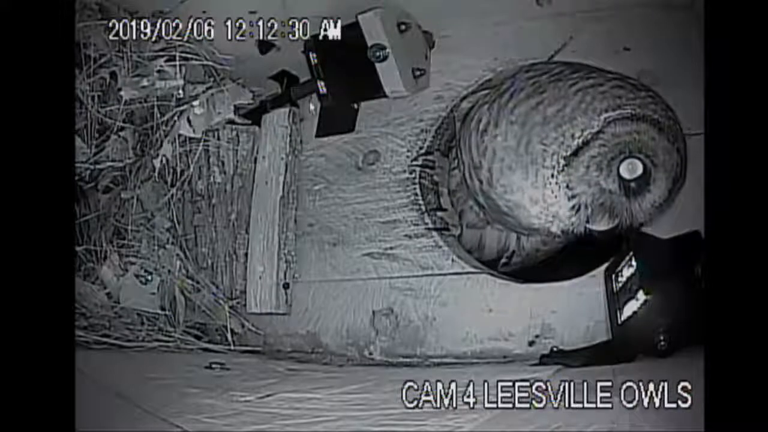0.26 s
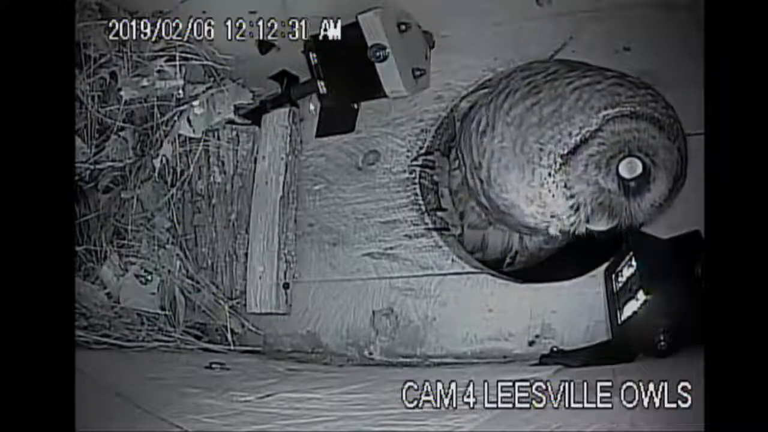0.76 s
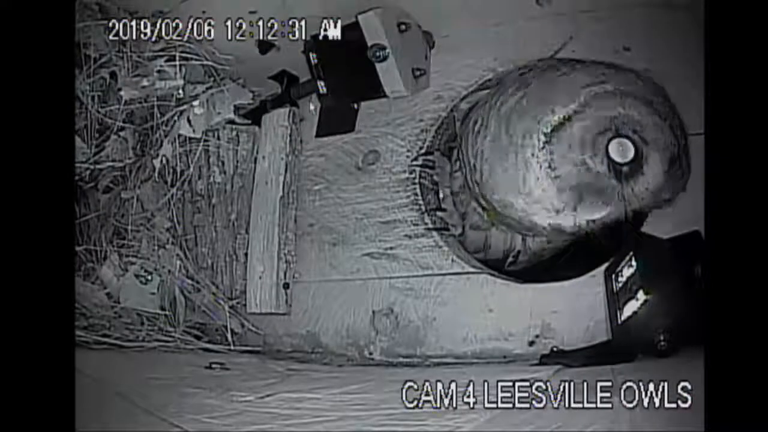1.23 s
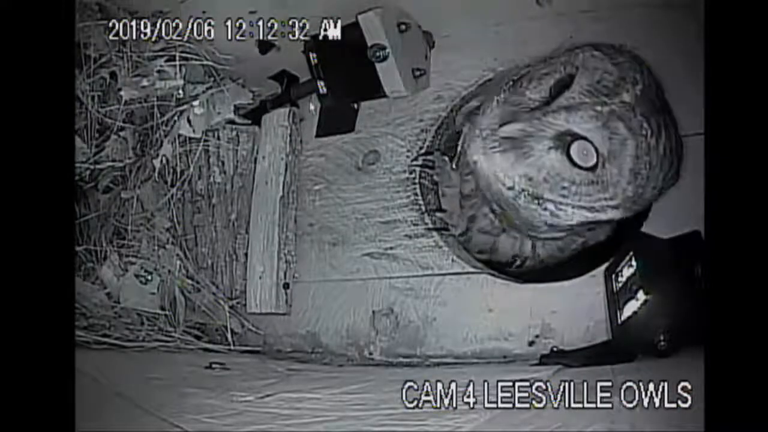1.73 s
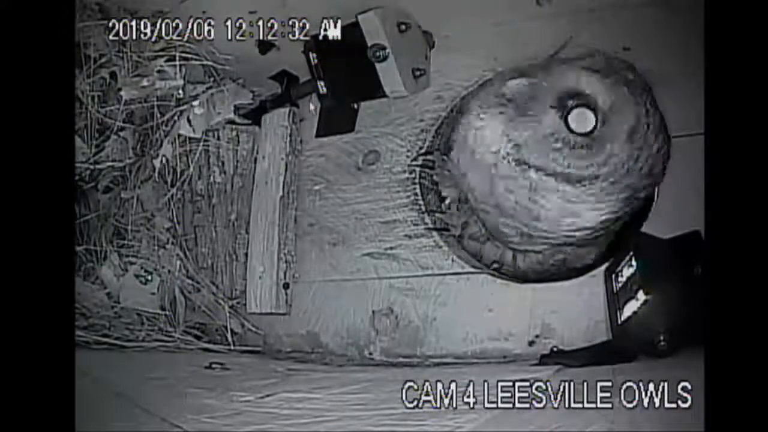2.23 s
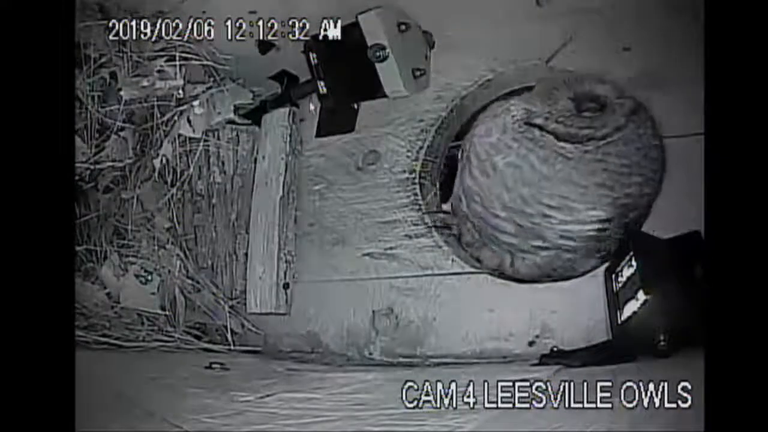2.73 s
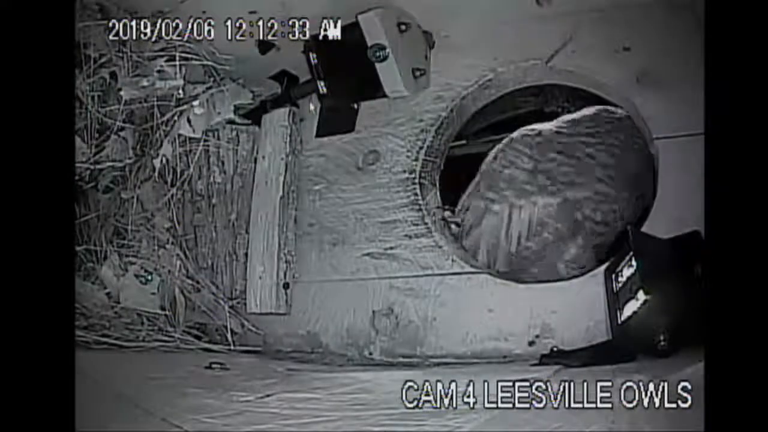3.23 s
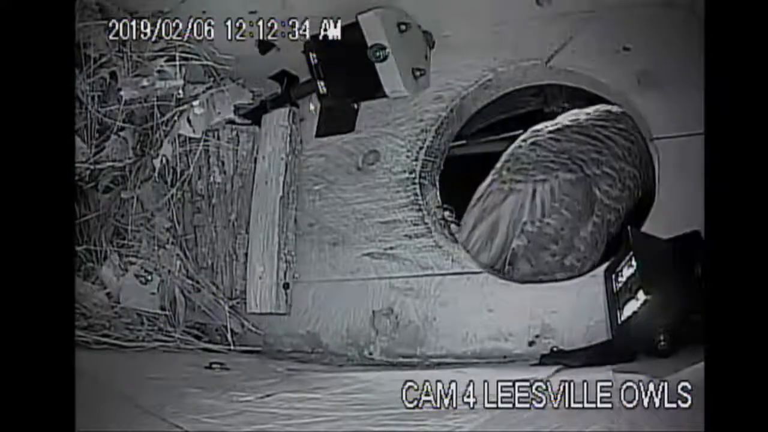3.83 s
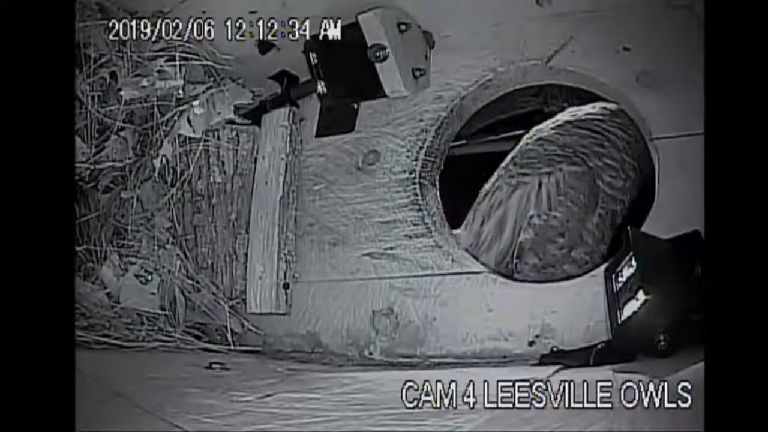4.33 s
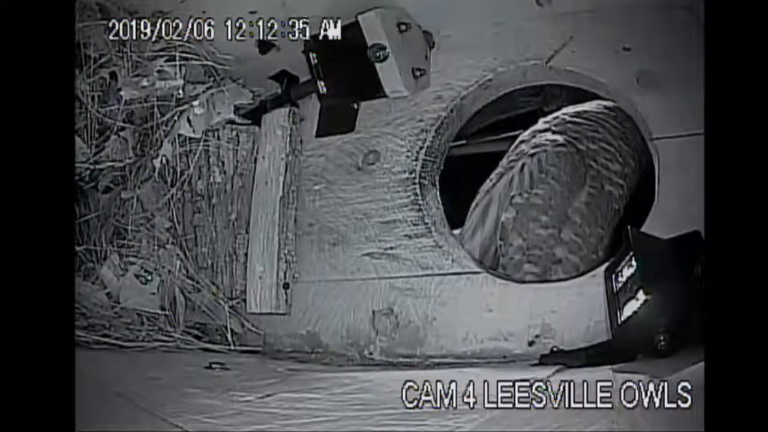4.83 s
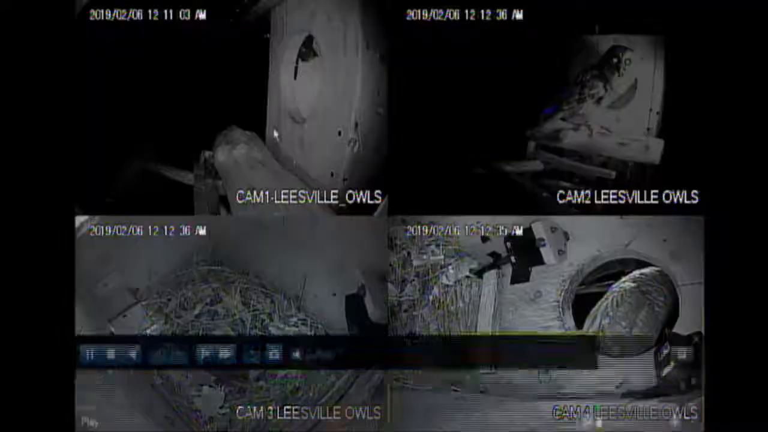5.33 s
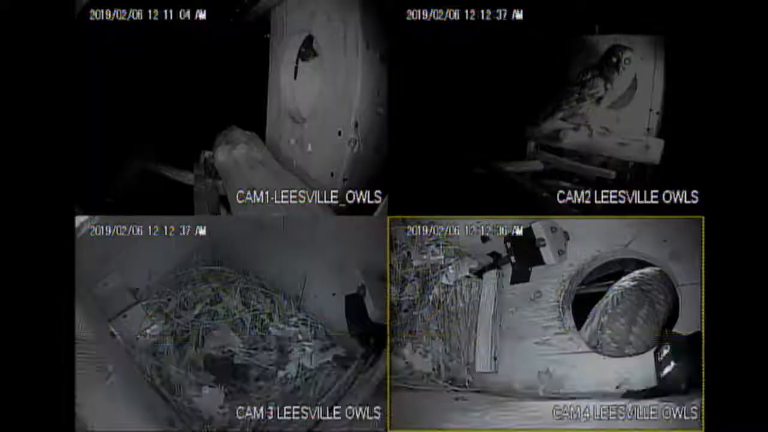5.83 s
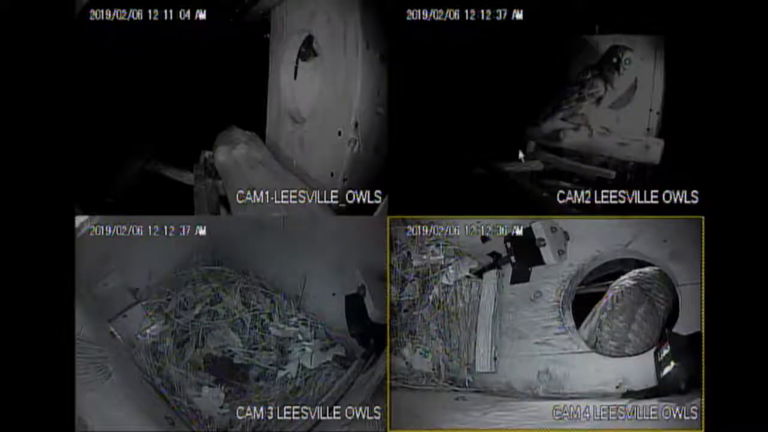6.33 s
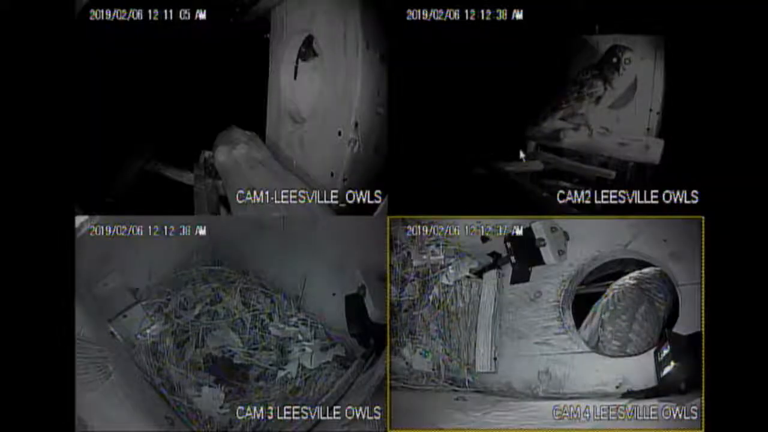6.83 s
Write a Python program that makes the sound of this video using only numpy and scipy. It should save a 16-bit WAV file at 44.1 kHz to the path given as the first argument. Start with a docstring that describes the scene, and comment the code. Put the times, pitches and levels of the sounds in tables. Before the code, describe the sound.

An owl hoots close by in two quick runs, each ending on a falling note, with claws and feathers scraping wood in between.

```python
"""Over faint night hiss, a barred owl in the entrance of a wooden nest box gives six short hoots and a
long falling note. Each hoot arches in pitch, so its overtones sweep through the ring of the box, and
the loud ones overload the small camera microphone inside. Next the owl turns to face outward: claws
scrape the rim and feathers brush the wood. As it settles it gives eight more short hoots, softer at
first, and ends on another long falling note."""
import sys
import numpy as np
from scipy import signal
from scipy.fft import rfft, irfft, next_fast_len
from scipy.io import wavfile
from scipy.ndimage import uniform_filter1d, map_coordinates

SR = 44100
rng = np.random.default_rng(int(sys.argv[2]) if len(sys.argv) > 2 else 0)


def persist_wave(psi):
    """Save psi, clipped to +-1, as 16-bit WAV."""
    counts = np.round(np.clip(psi, -1, 1) * 32767).astype(np.int16)
    wavfile.write(sys.argv[1], SR, np.atleast_2d(counts).T)


N = 311346

TURN_S = 3.0  # from here on the owl faces outward
REST_HZ = 123.85  # a short hoot starts and ends at this pitch
# The owl twists its head, swings its body round, then settles:
# (start [s], length [s], relative feather level [dB], relative rumble level [dB])
MOVES = [(2.296, 0.49, -62, -74), (2.793, .27, -51.5, -59), (3.699, 0.38, -75, -57.5)]


def amp(db):
    """Turn decibels into a number to multiply by."""
    return 10 ** (np.asarray(db) / 20)


def unit(x):
    """Scale a signal to an average (rms) size of 1."""
    return x / np.sqrt(np.mean(x ** 2) + 1e-20)


def clock():
    """The time of each sample, in seconds."""
    return np.arange(N) / SR


def wobble(rate):
    """A smooth curve through `rate` random points a second."""
    knots = rng.standard_normal(int(N * rate / SR) + 4)
    steps = np.arange(4 * len(knots)) / 4
    return np.interp(clock() * rate, steps, map_coordinates(knots, [steps]))


def coloured(x, points, size=4096):
    """Shape the tone of x along points of (frequency [Hz], gain [dB])."""
    points_hz, db = np.transpose(points)
    hz = np.fft.rfftfreq(size, 1 / SR)
    gain = amp(np.interp(np.log(hz + 1), np.log(points_hz + 1), db))
    # fold the filter so that it never answers before the sound arrives
    cepstrum = irfft(np.log(gain))
    cepstrum[1:size // 2] *= 2
    cepstrum[size // 2 + 1:] = 0
    return signal.oaconvolve(x, irfft(np.exp(rfft(cepstrum))))[:len(x)]


def cut_above(x, top_hz):
    """Remove every frequency from top_hz up."""
    size = 2 * next_fast_len(N // 2 + SR // 2)
    passes = np.fft.rfftfreq(size, 1 / SR) < top_hz
    return irfft(rfft(x, size) * passes, size)[..., :N]


def noise(spectrum):
    """Noise of average size 1, shaped by (frequency [Hz], relative level [dB]) points."""
    return unit(coloured(rng.standard_normal(N), spectrum))


def resonances(x, modes):
    """The ringing that x sets off, one tone per (frequency [Hz], width [Hz], gain [dB])."""
    return sum(amp(db) * signal.lfilter(*signal.iirpeak(hz, hz / width, fs=SR), x)
               for hz, width, db in modes)


def saturate(x, upper, lower, hardness):
    """Round off the peaks of a wave, with separate limits above and below zero."""
    limit = np.where(x > 0, upper, lower)
    return x / (1 + np.abs(x / limit) ** hardness) ** (1 / hardness)


def moving(start, length, attack_s=0.039, fade_s=0.53):
    """One body movement swells quickly, holds, then drops 60 dB every fade_s."""
    t = clock()
    swell = np.clip((t - start) / attack_s + 1, 0, 1)
    return swell * amp(-60 * np.maximum(t - start - length, 0) / fade_s)


def background(hiss_db, rumble_gain_db):
    """Faint night hiss, and a low rumble in the box that swells when the owl shifts its weight."""
    # tone of the night air: (frequency [Hz], relative level [dB])
    night = [(25, -12.5), (75, 6), (150, -10), (300, -6.5), (470, -1.5), (650, -8), (1500, -14.5),
             (3200, -12), (4500, -14), (8000, -28), (15000, -40)]
    sitting_still = amp(-68.5)
    shuffle = sum(amp(db) * moving(start, length) for start, length, _, db in MOVES)
    rumble = noise([(30, -25), (55, -10.5), (74, 1.0), (110, -9.0), (220, -25.5), (800, -63.5)])
    return amp(hiss_db) * noise(night) + amp(rumble_gain_db) * (sitting_still + shuffle) * rumble


def feathers(gain_db, flutter_db):
    """Feathers brush the entrance as the owl moves, making a fluttering rustle."""
    brush = sum(amp(db) * moving(start, length) for start, length, db, _ in MOVES)
    flutter = amp(gain_db + flutter_db * wobble(45))
    rustle = noise([(150, -22.5), (500, 2.5), (1300, 1.5), (2800, -20), (4000, -21.5), (8000, -33.5)])
    return brush * flutter * rustle


def taps(per_s=13, db=-57, scatter_db=5, bright_db=6.5, drag_s=0.01, middle_hz=1400):
    """Light claw touches scattered through each movement, as rows like the grips in claws()."""
    rows = []
    for start, length, _, _ in MOVES:
        slots = np.arange(start, start + length, 1 / per_s)
        for slot, (late, size, spot) in zip(slots, rng.uniform(-1, 1, (20, 3))):
            time = slot + abs(late) / per_s
            rows.append((time, db + scatter_db * size, bright_db, drag_s, middle_hz * 2 ** (spot / 2)))
    return rows


def claws(knock_db, scratch_db, thud_db, attack_s=0.001, fade_s=0.053):
    """Each claw drags in tiny slips over its own spot of the rim, ringing and jolting the box."""
    # firm grips on the rim:
    # (time [s], relative level [dB], brightness [dB], drag time [s], ring of the spot [Hz])
    grips = [(2.248, -40, -6.5, 0.0047, 2286), (2.44, -39, -10, 0.012, 933), (2.568, -42, 9, .015, 2130),
             (2.603, -38, -24, .003, 445), (2.761, -38, 11.5, 0.0037, 1390),
             (2.825, -30.5, 6.5, 0.016, 1364), (2.877, -28.5, 7, 0.0042, 1060),
             (2.918, -33, 4, 0.0026, 2900), (2.924, -21.5, -20, 0.0074, 690),
             (2.946, -33.5, -14, 0.034, 940), (3.032, -39.5, -30, 0.016, 690),
             (3.075, -28, -11, 0.0035, 1180), (3.35, -47.5, -11.5, 0.011, 905),
             (4.044, -42.5, -5, 0.013, 2014), (4.178, -42.5, 4, 0.03, 1790),
             (4.335, -50.5, -19, 0.0068, 1000)]
    # ring of the struck boards: (frequency [Hz], width [Hz], gain [dB])
    boards = [(260, 25, -22), (476, 16, 8), (701, 40, 5), (882, 60, 2), (1150, 160, -4.5),
              (1320, 490, -21.5), (2340, 230, -26.5)]
    # tone of a claw scratching wood: (frequency [Hz], gain [dB])
    scratch_tone = [(200, -21.5), (500, -1.5), (1300, -5.5), (2200, -2.5), (3100, -4), (3700, -14),
                    (4200, -27.5), (8000, -42.5)]
    knock, scratch = np.zeros(N), np.zeros(N)
    age = np.arange(SR // 4) / SR
    slips = unit(amp(3.0 * wobble(600))) * rng.standard_normal(N)  # grainy noise
    for start, db, bright_db, drag_s, spot_hz in grips + taps():
        span = slice(round(start * SR), round(start * SR) + len(age))
        onset = 1 - np.exp(-age / attack_s)
        stroke = onset * amp(db - 60 * np.maximum(age - drag_s, 0) / fade_s) * slips[span]
        stroke += resonances(stroke, [(spot_hz, 400, 2.5)])
        knock[span] += stroke
        scratch[span] += stroke * amp(bright_db)
    thud = coloured(knock, [(25, 2.0), (65, 10.5), (120, -15), (400, -36.0)])
    return (amp(knock_db) * resonances(knock, boards) + amp(thud_db) * thud
            + amp(scratch_db) * coloured(scratch, scratch_tone))


def hoot_arch(t, start, length, top_hz, rise_share=0.44, narrowness=1.6):
    """Pitch of a short hoot: up from rest to its top and down again."""
    past_top = (t - start) / length - rise_share
    away = past_top / np.where(past_top < 0, rise_share, 1 - rise_share)  # 0 at the top, -1, 1 at ends
    effort = np.abs(np.cos(np.pi / 2 * away)) ** narrowness
    return REST_HZ + (top_hz - REST_HZ) * effort


def loudness(t, hz, effort_db_per_octave=17, sag_db_per_octave=13, attack_s=0.009, release_s=0.019):
    """Strength of one note: more effort makes it higher and louder, and it sinks as its pitch falls."""
    facing_db = -2 if t[0] < TURN_S else -15
    top_db = facing_db + effort_db_per_octave * np.log2(hz.max() / 300)
    fades = np.minimum((t - t[0]) / attack_s, 1) * np.minimum((t[-1] - t) / release_s, 1)
    return fades * amp(top_db + sag_db_per_octave * np.log2(hz / hz.max()))


def phrasing(closing_boost_db=1, tiring_db_per_s=15):
    """Pitch and strength through both runs; a long note starts a little stronger, then weakens."""
    # short hoots: (start [s], length [s], top pitch [Hz])
    hoots = [(0.086, 0.093, 229.5), (0.389, .096, 279.1), (0.714, 0.1, 292.4), (1.04, .110, 304.9),
             (1.362, 0.12, 342.9), (1.69, 0.13, 335), (3.466, 0.094, 165.3), (3.791, 0.091, 214.8),
             (4.088, 0.1, 257.9), (4.393, .104, 276.6), (4.72, .104, 286), (5.064, 0.11, 315.5),
             (5.387, 0.12, 338.6), (5.72, 0.12, 350.2)]
    # the long note that closes each run, one list per note: (time [s], pitch [Hz])
    closing_notes = [
        [(1.86, 131.2), (1.889, 232), (1.913, 281.5), (1.972, 307.5), (2.021, 281.6), (2.049, 226.8),
         (2.099, 156.8), (2.149, 109.8)],
        [(5.949, 123.1), (5.975, 240), (5.994, 305.9), (6.047, 342), (6.08, 309.3), (6.131, 276),
         (6.155, 227.5), (6.183, 192.5), (6.282, 113.7)],
    ]
    t, pitch, strength = clock(), np.full(N, REST_HZ), np.zeros(N)
    for start, length, top_hz in hoots:
        on = (t > start) & (t < start + length)
        pitch[on] = hoot_arch(t[on], start, length, top_hz)
        strength[on] = loudness(t[on], pitch[on])
    for note in closing_notes:
        times, hz = np.transpose(note)
        on = (t > times[0]) & (t < times[-1])
        pitch[on] = np.interp(t[on], times, hz)
        tiring = amp(closing_boost_db - tiring_db_per_s * (t[on] - times[0]))
        strength[on] = loudness(t[on], pitch[on]) * tiring
    return uniform_filter1d(pitch, size=250), strength


def syrinx(pitch, strength, jitter, slack_hz, rasp_db, shimmer_db, harmonics=12):
    """The bird's voice organ pulses cleanly when taut, and unevenly at the low, slack ends of a note."""
    on = strength > 1e-5
    slack = np.clip(slack_hz / pitch[on], 0, 1) ** 5.5
    shaky_hz = pitch[on] * (1 + jitter * slack * wobble(220)[on])
    phase = 2 * np.pi * np.cumsum(shaky_hz) / SR
    pulses = sum(np.cos(k * phase) for k in range(1, harmonics + 1))
    rasp = amp(rasp_db) * slack * (1 + np.cos(phase)) * rng.standard_normal(N)[on]
    shimmer = amp(shimmer_db * slack * wobble(130)[on])
    voice = np.zeros(N)
    voice[on] = strength[on] * shimmer * (pulses + rasp)
    return voice


def owl():
    """The voice rings the air in the box; the ringing tones shift once the owl has turned outward."""
    # tone of throat and box together, facing in and facing out: (frequency [Hz], gain [dB])
    throat_in = [(100, -20.5), (250, -26.5), (330, -8), (400, -6), (480, 5.5), (570, -0.5), (680, -4),
                 (800, -24.5), (900, -11), (1050, -10.5), (1320, -26), (1600, -28.5), (2300, -35),
                 (3400, -43.5), (5000, -62)]
    throat_out = [(100, -15.5), (220, -22.5), (330, -8), (400, -3.5), (480, 3), (570, 1), (680, -8),
                  (800, -13), (1000, -17.5), (1320, -20.5), (1600, -33.5), (2700, -40), (3400, -40.5),
                  (5000, -63.5)]
    # ring of the air in the box, facing in and facing out: (frequency [Hz], width [Hz], gain [dB])
    box_in = [(479.2, 72, 2), (461, 8, -11), (886, 30, -6)]
    box_out = [(474.6, 37.2, 12.5), (554.7, 8.5, 0.5)]
    pitch, strength = phrasing()
    voice = syrinx(pitch, strength, jitter=0.03, slack_hz=191, rasp_db=-1, shimmer_db=3.0)
    inward, outward = np.split(voice, [round(TURN_S * SR)])
    inward, outward = coloured(inward, throat_in), coloured(outward, throat_out)
    return np.concatenate([inward + resonances(inward, box_in), outward + resonances(outward, box_out)])


def walls(x, tail_db, fade_s):
    """Sound bounces between the boards: a few quick echoes and a faint, dense tail."""
    # echoes inside the box: (delay [s], relative gain [negative flips the wave])
    echoes = [(.0031, 0.19), (.0057, -1.03), (.0094, 0.8), (0.0127, -0.21), (0.0217, -0.055)]
    t = np.arange(SR // 8) / SR
    tail = unit(rng.standard_normal(len(t)) * amp(-60 * t / fade_s))
    tail *= amp(tail_db) / np.sqrt(len(t))
    for delay, gain in echoes:
        tail[round(delay * SR)] += gain
    tail = coloured(tail, [(200, -17.0), (550, -15.0), (1000, -3.0), (3000, -7.0), (6000, -6.0)])
    return x + signal.oaconvolve(x, tail)[:N]


def scene():
    """Everything reaches the one microphone in the box."""
    movement = claws(knock_db=13.0, scratch_db=6.5, thud_db=2) + feathers(gain_db=5, flutter_db=5.0)
    in_box = walls(owl() + movement, tail_db=-20, fade_s=0.18)
    return np.array([in_box + background(hiss_db=-57.5, rumble_gain_db=1.5)] * 2)


def record(dry):
    """The microphone overloads; its camera cuts the treble, crackles when loud and feeds mostly left."""
    band_hz, sampling_hz = 3700, 8000  # of the camera
    clipped = saturate(dry[0], upper=0.45, lower=0.31, hardness=8.5)
    clipped = coloured(clipped, [(10, -13.0), (40, 0.5), (100, -0.5), (800, -1.43), (1500, -1.5),
                                 (2200, -3.5), (3000, -7.5), (3700, -9.0), (8000, -12.5)])
    muffled = signal.sosfilt(signal.butter(14, band_hz, fs=SR, output="sos"), clipped)
    level = uniform_filter1d(np.abs(dry[0]), size=900)
    overload = np.clip((level - 0.22) / 0.28, 0, 1)  # none at moderate levels, full in the loudest hoots
    crests = overload * (muffled - saturate(muffled, upper=0.32, lower=0.34, hardness=32))
    crackle_tone = [(2000, -38), (3600, -17.5), (4300, -2), (6000, -2.5), (9000, -1.5), (15000, 2.0)]
    crackle = amp(-3.0) * coloured(crests, crackle_tone)
    # a faint, high copy of the sound, mirrored around the camera's sampling rate
    mirror = amp(-49) * muffled * np.cos(2 * np.pi * sampling_hz * clock())
    left_hiss = amp(-76.0) * noise([(1000, -2), (4500, 4.5), (8000, -3.5), (15000, -7.0)])
    right_hiss = amp(-88.0) * rng.standard_normal(N)
    camera = muffled + crackle + mirror
    return cut_above(np.array([camera + left_hiss, amp(-33.8) * camera + right_hiss]), top_hz=15800)


dry = scene()
out = record(dry)
persist_wave(out)
```